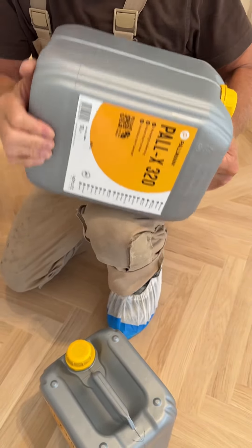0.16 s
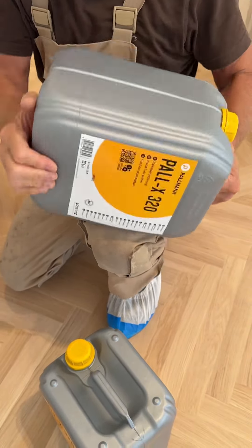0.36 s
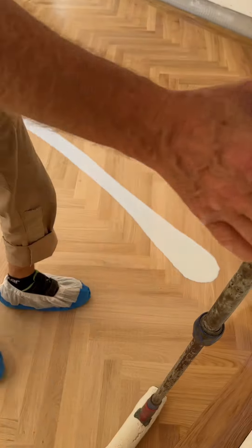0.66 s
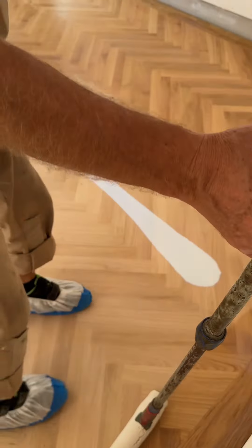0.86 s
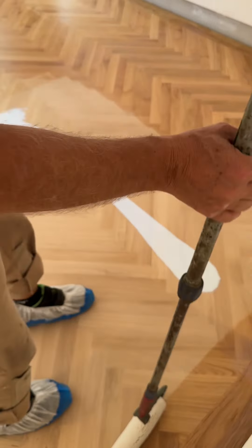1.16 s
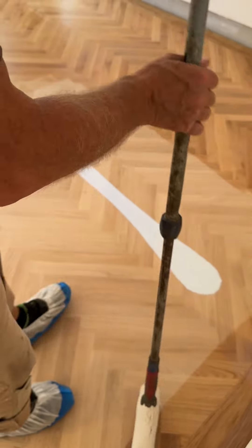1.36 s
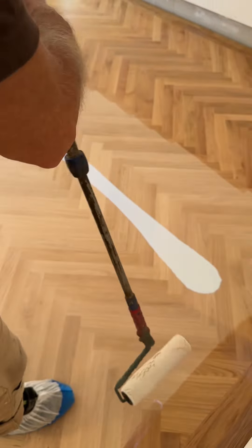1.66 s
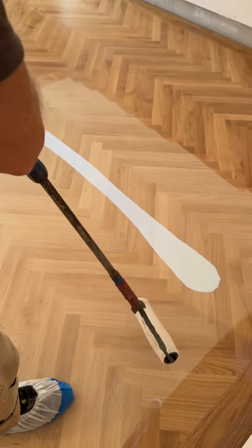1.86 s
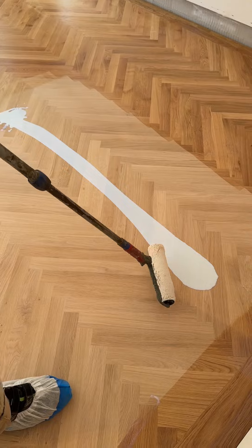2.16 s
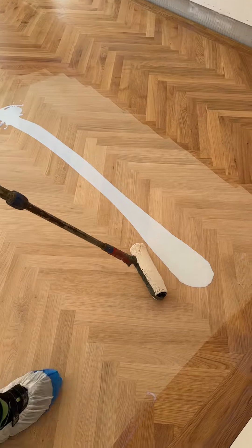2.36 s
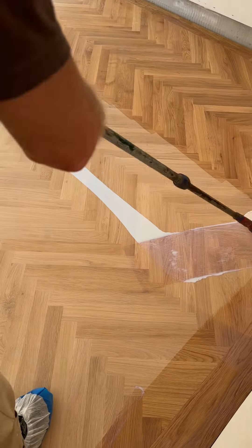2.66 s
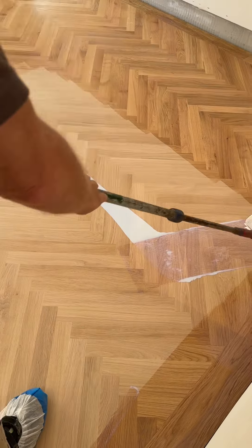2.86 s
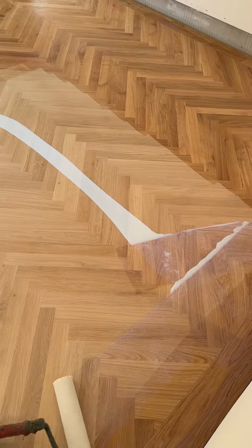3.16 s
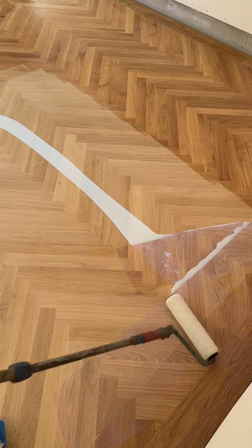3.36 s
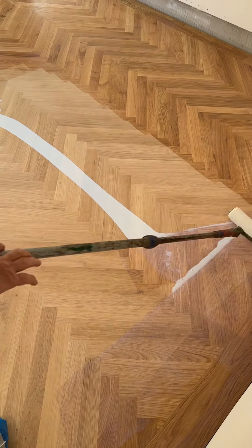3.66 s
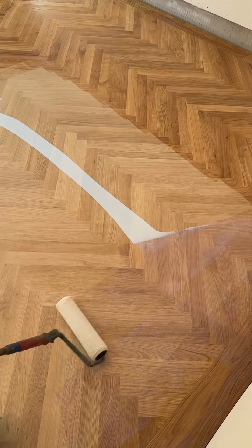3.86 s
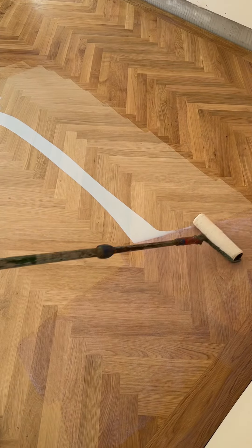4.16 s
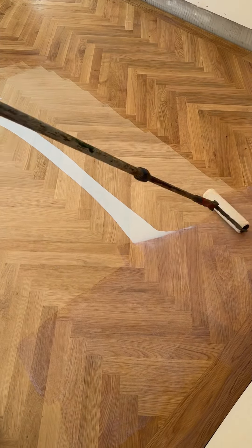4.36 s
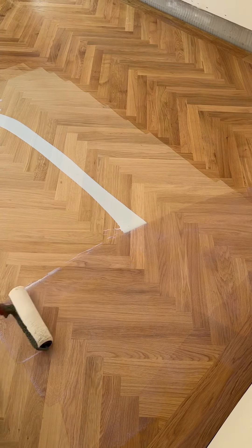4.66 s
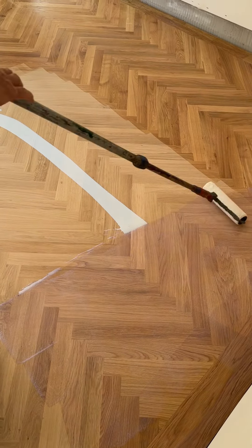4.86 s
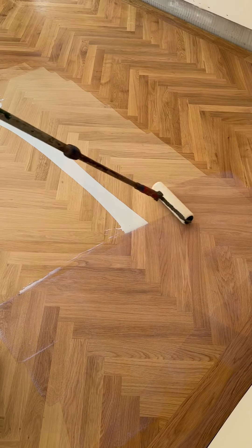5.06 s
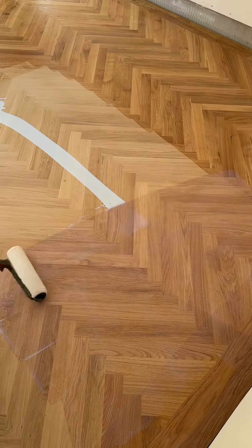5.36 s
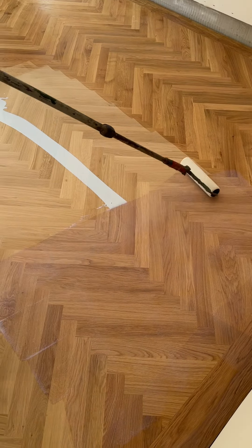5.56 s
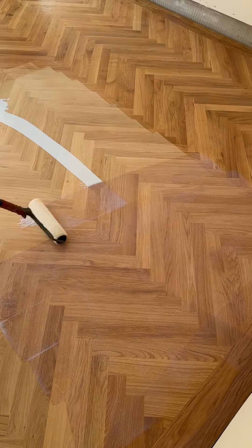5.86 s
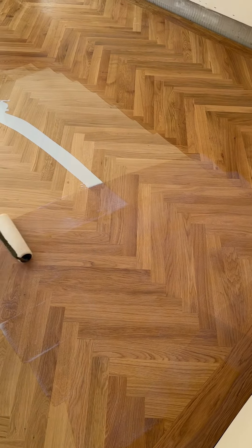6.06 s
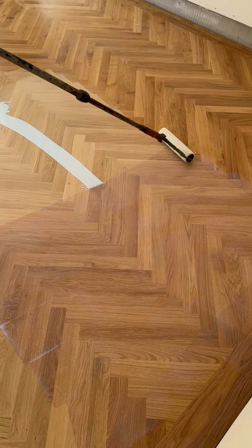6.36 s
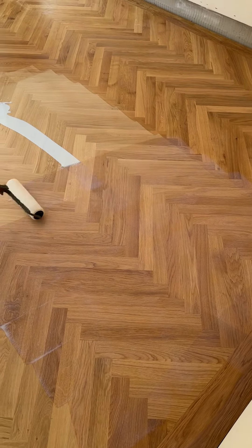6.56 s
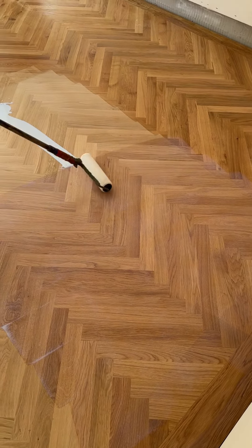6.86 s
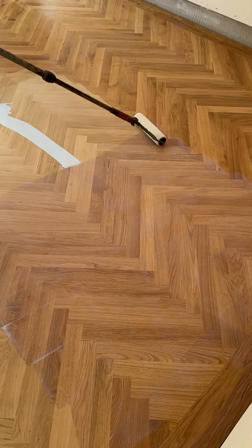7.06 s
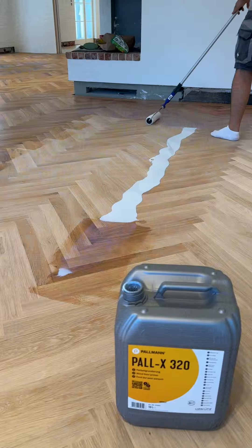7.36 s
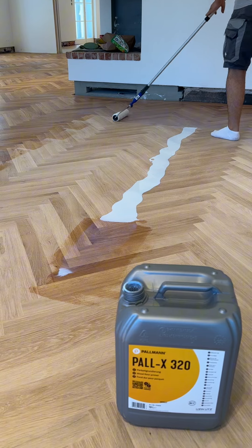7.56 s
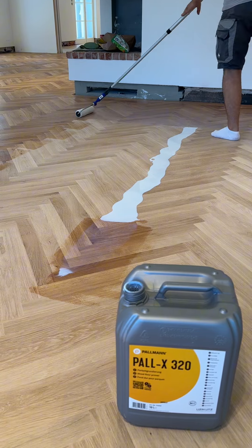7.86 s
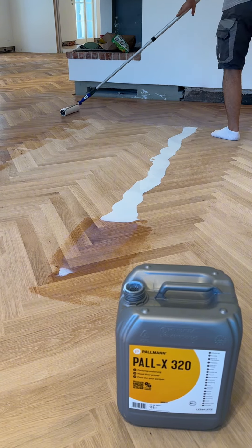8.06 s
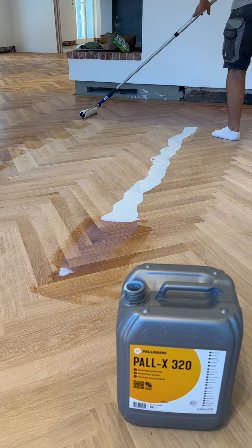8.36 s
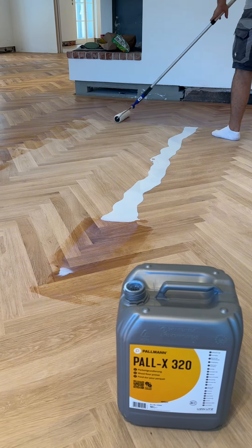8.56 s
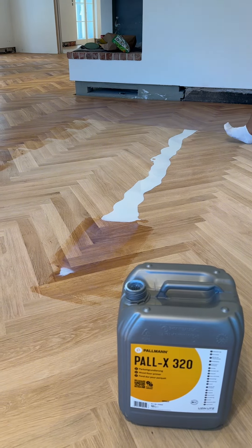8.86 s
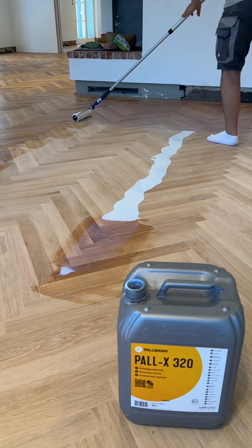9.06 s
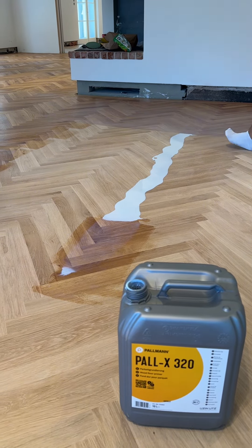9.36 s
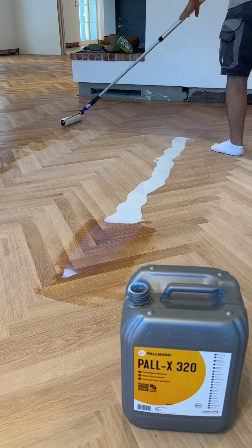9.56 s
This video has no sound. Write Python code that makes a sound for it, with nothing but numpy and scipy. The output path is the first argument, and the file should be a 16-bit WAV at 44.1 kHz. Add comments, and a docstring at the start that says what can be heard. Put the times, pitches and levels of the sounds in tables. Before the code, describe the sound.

Thick liquid glugs and splashes from a canister, then a wet roller fizzes and rumbles over wooden boards in long strokes, ending in quick squeaky scrubs.

```python
"""First floor lacquer glugs out of a canister: a gurgling, splashing stream with gulped bubbles and wet splats.
Then a wet roller on a pole spreads it over parquet in three passages of long strokes. The nap peels off the
film in a dense fizz, squeezes liquid ahead of it and rumbles on the boards; pressed hard, it groans.
While the roller rolls, feet shift softly, the boards are knocked and the frame clicks.
Last come short scrubbing strokes with pole clacks and squeaks, over a machine hum that sinks near the end."""
import sys
import numpy as np
from scipy import signal
from scipy.fft import rfft, irfft, next_fast_len
from scipy.io import wavfile

SR = 44100
rng = np.random.default_rng(int(sys.argv[2]) if len(sys.argv) > 2 else 0)


def master(y):
    """Save y as 16-bit WAV."""
    cut = np.clip(np.atleast_2d(y).T, -1, 1)
    pcm = np.round(cut * 32767)  # scale
    wavfile.write(sys.argv[1], SR, pcm.astype(np.int16))


N = 427769
TIME = np.arange(N) / SR

# Edges of the five passages: pouring, three of rolling, scrubbing. Each row: a time in seconds.
PASSAGE_EDGES = [0, .528, 2.295, 7.367, 8.68, 9.71]

# Bands in which layers get their level. Each: lowest and highest frequency in Hz.
TREBLE, MIDDLE, BASS, SUB = (4000, 9000), (600, 3000), (110, 400), (30, 100)
BUBBLY, SPLASHY = (150, 1000), (1500, 8000)

# Stereo images. Each row: frequency in Hz, left-right likeness from 0 to 1, phase lead of the left in radians.
FOCUSED = [(250, .97, 0), (700, .35, .8), (1300, .35, .6), (1900, .68, 0), (2800, .35, -2.9),
           (3500, .12, 0), (5000, .15, -2), (5500, .88, -.25), (7200, .78, -.3), (8600, .6, -1.7),
           (9900, .92, -3.05), (10800, .99, -3.14), (13600, .98, -3.16), (15700, .45, -4.9)]
WIDE = [(60, 0.75, 0), (200, 0.42, 0), (397, 0.064, 0), (4470, 0.025, -2), (6900, 0.39, -1.46),
        (11000, 0.079, -2), (11350, 1, -3.5), (12100, 0.9, -2), (13600, 0.13, -3.5)]
NARROW = [(2140, 1, 0), (2800, 0.65, 0.5), (4500, 0.32, 0.8), (9500, 0.5, 0.4), (11300, 0.7, .1),
          (12200, 1, 0), (13600, .75, .1), (14500, .35, .5)]

# Background: deep rumble of the room. Each row: level in dB, for one of the first four passages.
DEEP_DB = [-51.5, -62, -83, -58]
# Tone of the deep rumble, then of the air. Each row: frequency in Hz, relative density in dB per Hz.
DEEP_TONE = [(20, -36), (40, -21), (60, -0.5), (75, 3.5), (92, -3), (130, -25), (300, -65), (1000, -84)]
AIR_TONE = [(30, -35), (150, 6), (350, 10.5), (800, 0), (2000, -9), (5000, -1), (15000, -84)]

# Machine hum. Each row: partial in Hz, mean level in dB rms, change near the end in dB.
HUM = [(376.8, -73, -6), (419.5, -61.8, -3), (490.5, -58, -15), (559.9, -71, 0), (630, -76, 0),
       (700, -74.5, 0), (748.3, -73, 0), (829, -73, -11), (1136, -70.5, -11), (1200, -75, 0),
       (1486, -76, -11)]
HUM_DROP_S, HUM_FADE_S = 9.46, .08
HUM_WAVER_DB, HUM_WAVER_RAD, HUM_WAVERS_PER_S = 1, .1, 8

# Soft footfalls. Each row: start in seconds, peak level in dB.
STEPS = [(0.884, -41), (1.925, -59), (2.29, -52), (3.769, -63), (3.88, -53), (4.6, -60), (4.764, -55),
         (5.12, -62), (6.025, -66), (6.125, -58), (6.43, -72), (7.48, -61), (7.968, -44)]
# Floor joists. Each row: mode in Hz, relative level in dB, time to fall by 60 dB in seconds.
JOISTS = [(56, -2, 0.17), (80, 0, 0.18)]

# Knocks on the boards, ahead of room and low cut. Each row: start in seconds, peak in dB, board pitch in Hz.
THUMPS = [(0.821, -46, 231), (1.183, -47, 161), (1.222, -38, 204), (1.229, -37, 178), (1.32, -45, 165),
          (1.37, -51, 217), (1.391, -50, 178), (1.921, -39, 205), (1.935, -42, 188), (2.262, -52, 200),
          (2.3, -45.5, 135), (2.667, -53, 149), (2.838, -48, 204), (3.291, -49.5, 190), (3.326, -48, 214),
          (3.392, -48, 212), (3.412, -50, 205), (3.472, -49, 231), (4.068, -44.5, 196), (4.106, -47, 150),
          (4.16, -46, 181), (4.436, -50.5, 200), (4.583, -46, 194), (4.634, -40, 166), (4.655, -43, 165),
          (5.028, -48, 155), (6.436, -44, 152), (6.455, -49, 150), (6.488, -44, 147), (6.855, -52, 195),
          (6.978, -56, 187), (7.015, -45, 175), (7.167, -56, 188)]
# Modes of a board. Each row: multiple of its pitch, relative level in dB, time to fall by 60 dB in seconds.
BOARD_MODES = [(.78, -6, 0.061), (1, 11, 0.052), (1.5, -8, 0.12), (3.6, -13, 0.021)]

# Clicks of play in the roller frame, ahead of the room. Each row: start in seconds, knock level in dB,
# knock pitch in Hz, half-width of its band as a natural log ratio, snap level in dB.
CLICKS = [(1.122, -60, 7500, .3, -76), (1.221, -54.5, 620, .55, -68), (2.278, -59, 1850, .3, -67),
          (2.288, -58.5, 1500, .5, -68), (2.664, -69, 800, .9, -73), (2.673, -59, 850, .65, -72),
          (2.769, -70, 790, .5, -76), (2.776, -61, 850, .9, -57.5), (2.84, -68, 1300, 1, -74),
          (3.467, -58, 1350, .4, -67), (3.477, -57, 1150, .4, -64), (3.728, -62, 1200, .4, -64),
          (5.035, -69, 1700, .6, -59), (7.023, -52.5, 620, 1.15, -57.5)]
KNOCK_PEAK_S, SNAP_PEAK_S = .0017, .0012  # time from the start to the fullest
# Band of the snap. Each row: an edge in Hz.
SNAP_BAND_HZ = (2000, 9000)

# Clacks of the pole, ahead of room and low cut. Each row: start in seconds, peak level in dB.
CLACKS = [(8.706, -31), (8.716, -38), (9.111, -42.5), (9.665, -46)]
# The struck pole. Each row: mode in Hz, relative level in dB, time to fall by 60 dB in seconds.
POLE_MODES = [(510, -7.5, 0.093), (835, 4, 0.053), (920, 1, 0.074), (1210, 0, 0.039), (1424, 7.5, 0.018),
              (1867, -9, 0.12)]

# Squeaks of the sleeve. Each row: start in seconds, length in seconds, mean pitch in Hz, level in dB.
SQUEAKS = [(9.172, 0.033, 1220, -57), (9.311, .08, 699, -58), (9.4, 0.085, 1210, -56),
           (9.531, 0.076, 758, -60), (9.652, 0.052, 780, -53), (9.655, 0.047, 935, -51)]
SQUEAK_WOBBLE, SQUEAK_ROUGH_DB = .025, 3.5  # pitch as a share, loudness in dB

# Puddles under the sleeve. Each row: start in seconds, length in seconds, fullest at 0-1, level in dB.
PUDDLES = [(3.289, 0.29, 0.6, -57.5), (3.645, 0.092, 0, -64), (4.34, 0.06, 0.07, -59),
           (4.372, .11, .06, -64), (6.742, 0.16, 0.1, -68.5)]
# Tone of the slurp. Each row: frequency in Hz, relative density in dB per Hz.
SLURP_TONE = [(600, -25), (1000, -10), (1400, 2), (1900, -3), (2100, -3), (2550, 3), (3200, -2), (5000, -9),
              (9000, -30)]

# Hard presses of the sleeve. Each row: start in seconds, length in seconds, extra rumble in dB,
# then low, middle and high groan in dB, ahead of a small common lift.
PRESSES = [(1.27, .36, .5, -64, -59.5, -75), (1.93, .36, 0.28, -70, -73, -85),
           (4.046, 0.12, 2, -73, -70, -77), (4.575, 0.17, 10, -73, -57, -60.5),
           (6.415, 0.25, 5.1, -60, -62, -82)]
PRESS_FIZZ, PRESS_SQUISH = -0.75, 0.045  # dB of fizz and of squish for each dB of extra rumble
# Resonances of the groan. Each row: mean frequency in Hz, width in Hz.
GROAN = [(390, 180), (790, 290), (2420, 470)]
GROAN_GLIDE, GROAN_LIFT_DB = 0.1, 0.5  # pitch rise in a press as a share; common lift

# Surges of the stream. Each row: start in seconds, length in seconds, fullest at 0-1, gurgle and splash in dB.
SURGES = [(-.04, 0.087, 0.1, -38, -45.5), (0.069, 0.081, 0.32, -37.5, -37.5),
          (0.175, 0.16, 0.4, -41.5, -48), (0.329, 0.11, 0.2, -44, -39), (0.478, 0.055, 0.3, -45, -47.5)]
# Steady stream under the surges. Each row: level in dB, for gurgle then splash.
STREAM_DB = (-44, -49)
# How a surge swells. Each row: the power of the flow, for gurgle then splash.
SURGE_LAW = (0.26, 1)
# Gulped bubbles, ahead of left-right placing. Each row: start in seconds, peak level in dB,
# pitch at the start in Hz, time to die away to about a third in seconds.
GLUGS = [(.022, -32, 320, .008), (.031, -29, 360, .005), (.042, -28.5, 345, .0045),
         (.051, -28.5, 205, .0054), (.064, -30, 620, .005), (.072, -33, 300, .0045),
         (.105, -26, 230, .0045), (.116, -27.5, 380, .0065), (.224, -28, 525, .012),
         (.256, -26.5, 537, .0068), (.259, -30, 1500, .0034), (.260, -32, 950, .0024),
         (.326, -37, 1350, .005), (.350, -33, 543, .0085), (.366, -32, 1250, .0045),
         (.382, -33, 490, .0084), (.487, -32, 472, .011), (.492, -31.5, 930, .006), (.507, -28, 379, .013)]
# Gobs of lacquer landing, ahead of left-right placing. Each row: start in seconds, level at the start in dB.
SPLATS = [(.093, -35), (.108, -35), (0.116, -29.5), (0.26, -39), (.382, -34)]
SPLAT_T60_S = 0.014
# Tones of splat, gurgle and splash. Each row: frequency in Hz, relative density in dB per Hz.
SPLAT_TONE = [(300, -14), (1200, 0), (2500, 9), (4000, -6), (7500, -8), (10500, -11), (15500, -24)]
GURGLE_TONE = [(40, -22), (90, 5), (170, 2), (330, 2.5), (550, 2.5), (730, -1.5), (920, -0.5), (1500, -9),
               (3000, -48)]
SPLASH_TONE = [(300, -27), (900, 2), (1700, 1), (2050, 0), (2550, 3.5), (3300, -4.5), (4000, -4),
               (5200, -9), (8300, -10), (10500, -16.5), (15500, -25)]
# Canister rung by the splashing. Each row: resonance in Hz, width in Hz, level in dB ahead of the common ring level.
CANISTER = [(1140, 41, -3), (1670, 64, -5), (2140, 56, 2), (2510, 54, -4), (4030, 87, -8)]
CANISTER_RING_DB = -3.5
# Where the pouring sits. Each row: frequency in Hz, left minus right in dB.
POUR_SIDE = [(60, -1), (110, 0), (200, 0.5), (380, 1.5), (700, 5), (1290, 1.5), (2380, -2.5), (4400, 1.5),
             (8120, 0), (15000, -1)]

# Quick last strokes. Each row: start in seconds, length in seconds, fastest at 0-1, then peak levels of
# peeling fizz, rubbing and board rumble in dB.
SCRUBS = [(8.649, 0.19, 0.6, -57.5, -57.5, -72), (8.826, 0.18, 0.34, -56, -57, -73),
          (8.968, 0.15, 0.47, -57, -60, -71), (9.112, 0.15, 0.23, -55.5, -54, -70),
          (9.268, 0.14, 0.39, -57, -52.5, -66.5), (9.374, 0.15, 0.5, -55.5, -52.5, -66),
          (9.51, 0.13, 0.54, -57, -51.5, -70), (9.625, 0.11, 0.43, -55, -52, -86)]
# What lingers as the roller turns. Each row: level in dB, for fizz, rubbing, then rumble.
SCRUB_TURN_DB = (-64, -72, -79)
# How a scrub swells. Each row: the power of the speed, for fizz, rubbing, then rumble.
SCRUB_LAW = (0.94, 1, 0.43)
# Tones of scrubbing fizz, rubbing and rumble. Each row: frequency in Hz, relative density in dB per Hz.
THIN_FIZZ_TONE = [(150, -50), (800, -1.5), (2800, -1.5), (4800, 0.5), (7000, 1), (11500, -2), (15500, 0.5)]
RUB_TONE = [(100, -38), (260, -29), (400, -1), (750, 0), (1050, -3), (1250, -0.5), (1800, -4), (2300, -13),
            (3200, -26), (8000, -43)]
THIN_RUMBLE_TONE = [(100, -42), (220, -11), (340, -4.5), (385, 5.5), (450, -2), (700, -5), (2000, -38)]
# Pole rung by the rubbing. Each row: resonance in Hz, width in Hz, level in dB ahead of the common ring level.
RUBBED_POLE = [(383, 18, 0), (515, 35, -1), (653, 45, -2), (740, 24, -0.45), (924, 22, 1), (1210, 40, 2),
               (1450, 53, 1.4), (1690, 40, 0)]
RUBBED_RING_DB = 3

# Long roller strokes. Each row: start in seconds, length in seconds, fastest at 0-1, then peak levels of
# peeling fizz, squish and board rumble in dB, ahead of overlap, pressing, unevenness and left-right placing.
STROKES = [(0.731, 0.35, 0.26, -57, -58.5, -55), (0.944, 0.28, 0.64, -59, -65, -64.5),
           (1.202, 0.69, 0.08, -64.5, -61, -59.5), (1.932, 0.69, 0, -67, -68.5, -59),
           (2.302, 0.32, 0.35, -64.5, -60.5, -65), (2.787, 0.11, 0.1, -73, -63.5, -63),
           (2.805, 0.41, 0.64, -60.5, -62, -62.5), (3.23, 0.36, 0.5, -57.5, -61.5, -62.5),
           (3.559, 0.39, 0.81, -59, -60, -61.5), (3.973, 0.33, 0.53, -57.5, -58.5, -60),
           (4.338, 0.37, 0.36, -57, -62, -58.5), (4.554, 0.41, 0.52, -56, -59, -60.5),
           (4.977, .33, 0.59, -59, -67, -59.5), (5.346, 0.32, 0.33, -58.5, -64.5, -65),
           (5.67, 0.35, 0.51, -61.5, -69, -66.5), (6.036, 0.3, 0.39, -60, -65, -64.5),
           (6.389, 0.33, 0.41, -58.5, -67, -59.5), (6.73, 0.49, 0.27, -62.5, -66.5, -62),
           (7.105, 0.27, 0.7, -62, -72, -66), (7.235, 0.44, 0.18, -52, -56, -58),
           (7.738, 1.12, 0.27, -55, -59.5, -65)]
# How a stroke swells. Each row: the power of the speed, for fizz, squish, then rumble.
STROKE_LAW = (0.93, 0.8, .99)
OVERLAP_S = 0.028  # the sleeve turns on a little before and after each stroke
# Tones of fizz and squish, and of rumble in two kinds. Each row: frequency in Hz, relative density in dB per Hz.
FIZZ_TONE = [(600, -8), (2000, 1.5), (3500, 3), (5100, 4.5), (6500, 6), (8500, 0.5), (12000, -10),
             (15500, -11)]
SQUISH_TONE = [(200, -13), (480, 0.5), (760, -1), (1100, 0.5), (1650, -1.5), (2450, 1), (3300, -3.5),
               (5000, -13), (12000, -58)]
RUMBLE_TONE = [(50, -20), (92, -19), (122, 6.5), (170, 1.5), (235, 2.5), (300, 0.5), (480, -5), (620, -4.5),
               (750, -15), (1100, -7.5), (3000, -27)]
BROAD_RUMBLE_TONE = [(50, -47), (110, 8.5), (170, 0), (240, 1.5), (325, 4), (420, -5.5), (700, -0.5),
                     (1100, -42), (3000, -52)]
# Hollow colours of the squish: the roller core, then a reflection off the floor.
# Each row: centre in Hz, width in Hz.
HOLLOW_COLOURS = [(760, 210), (2420, 17)]
# the rumble centres on a note that climbs with the speed
RUMBLE_REST_HZ, RUMBLE_RISE_HZ, RUMBLE_WIDTH_HZ, RUMBLE_NOTE_DB = 136.5, 65, 67, 3
# the wet pocket under the sleeve rings at a wandering pitch (swing as a natural log ratio)
POCKET_HZ, POCKET_WIDTH_HZ, POCKET_DB, POCKET_SWING, POCKET_PER_S = 1110, 130, -5.5, .4, 22
# the froth bursts in clumps, and the sleeve is unevenly soaked
CLUMP_DB, CLUMPS_PER_S, WETNESS_DB, WETNESS_PER_S = 1.7, 70, 1.03, 45

EDGE_HZ = 15780  # top of the whole sound


def amp(db):
    """Decibels to gain."""
    return 10 ** (np.asarray(db) / 20)


def unit(x):
    """Scales to rms 1."""
    return x / np.sqrt(np.mean(x ** 2) + 1e-20)


def read(points, hz, axis=1):
    """One column of a table over log frequency."""
    table = np.array(points)
    return np.interp(np.log(hz + 1), np.log(table[:, 0] + 1), table[:, axis])


def add(mix, s, sound):
    """Mixes a sound in at second s."""
    part = mix[..., max(0, round(s * SR)):][..., :sound.shape[-1]]
    part += sound[..., :part.shape[-1]]


def passage(order):
    """Sample times of one passage."""
    return TIME[round(PASSAGE_EDGES[order] * SR):round(PASSAGE_EDGES[order + 1] * SR)]


def wander(t, per_s):
    """A random curve of rms 1, in straight lines between per_s new values a second."""
    knots = rng.standard_normal(4096)
    return unit(np.interp((t - t[0]) * per_s, np.arange(len(knots)), knots))


def grains(t, per_s, spread_db, wash):
    """Tiny pops of uneven size, in two versions, over the wash of their reflections."""
    happens = rng.random(len(t)) < per_s / SR
    size = amp(spread_db * np.minimum(rng.exponential(1, len(t)), 5)) * happens
    pops = size * rng.choice([-1, 1], (2, len(t)))
    return unit(pops) + wash * rng.standard_normal((2, len(t)))


def bubbles(t, per_s, low_hz, high_hz, cycles, spread_db):
    """A swarm of bubbles of many sizes; each rings for a few cycles and rises in pitch."""
    out, age = np.zeros((2, len(t))), np.arange(SR // 12) / SR
    for hz in np.geomspace(low_hz, high_hz, num=40):
        life = age * hz / cycles
        tone = np.sin(2 * np.pi * hz * age * (1 + 0.0281 * np.minimum(life, 5)))
        ring = unit(tone * np.exp(-life) * (1 - np.exp(-6 * life)))
        happens = rng.random(out.shape) < per_s * np.sqrt(hz / high_hz) / SR
        births = happens * amp(spread_db * rng.standard_normal(out.shape))
        out += hz ** 0.21 * signal.oaconvolve(births, ring[None], axes=1)[:, :len(t)]
    return unit(out)


def colour(drive, spectrum, pair, band):
    """Gives a drive its spectrum and stereo image; the mono mean has rms 1 in the band."""
    size = next_fast_len(drive.shape[1])
    hz = np.fft.rfftfreq(size, 1 / SR)
    a, b = rfft(drive, size) * amp(read(spectrum, hz))
    same = read(pair, hz)
    right = (same * a + np.sqrt(1 - same ** 2) * b) * np.exp(-1j * read(pair, hz, axis=2))
    z = np.array([a, right])
    in_band = (hz > band[0]) & (hz < band[1])
    rms = np.sqrt(2 * np.sum(abs(z.mean(0)[in_band]) ** 2)) / size
    return irfft(z / rms, size)[:, :drive.shape[1]]


def resonate(x, hz, width):
    """A resonance of gain 1 that follows the curve hz."""
    turn, r = np.exp(2j * np.pi * np.cumsum(hz) / SR), np.exp(-np.pi * width / SR)
    return 2 * (turn * signal.lfilter([1 - r], [1, -r], x / turn)).real


def ringing(x, resonances, ring_db):
    """A drive together with the resonances that it rings."""
    return x + sum(amp(ring_db + db) * resonate(x, np.full(x.shape[-1], hz), width)
                   for hz, width, db in resonances)


def arch(t, s, length, top):
    """Rises from rest to 1 at the share top of its length, and comes to rest again."""
    return np.sin(np.pi / 2 * np.interp((t - s) / length, [0, np.clip(top, .05, .95), 1], [0, 1, 0]))


def swells(t, rows, rest_db, law):
    """One gain curve per layer: the powers of a resting level and of each movement add up."""
    power = amp(rest_db)[:, None] ** 2
    for s, length, top, *peak_db in rows:
        gain = amp(peak_db)[:, None] * arch(t, s, length, top) ** np.array(law)[:, None]
        power = power + gain ** 2
    return np.sqrt(power)


def room(x, wet_db, t60):
    """Adds a bare room's tail of decaying noise, different in each channel."""
    t = np.arange(SR // 2) / SR
    tail = rng.standard_normal((2, len(t))) * amp(-60 * t / t60) * (t > .004)
    return x + amp(wet_db) * signal.oaconvolve(x[None], tail / np.linalg.norm(tail[0]), axes=1)[:, :N]


def strike(rows, modes, rise_s, detune):
    """Each blow rings the same modes, randomly detuned and scaled by its pitch, if it has one."""
    out, t = np.zeros(N), np.arange(SR // 4) / SR
    hz, db, t60 = np.transpose(modes)[:, :, None]
    shifts = rng.standard_normal((len(rows), len(modes), 1))
    for (s, peak_db, *pitch), shift in zip(rows, shifts):
        tones = np.sin(2 * np.pi * hz * np.prod(pitch) * (1 + detune * shift) * t)
        ring = (amp(db - 60 * t / t60) * tones).sum(0) * (1 - np.exp(-t / rise_s))
        add(out, s, amp(peak_db) * ring / abs(ring).max())
    return out


def background():
    """Faint room air and a deep rumble, both noise; they fade swiftly as the scrubbing begins."""
    ends = np.concatenate([passage(order=k)[[0, -1]] for k in range(len(DEEP_DB))])
    deep = np.interp(TIME, ends, np.repeat(amp(DEEP_DB), 2))
    low = deep * colour(rng.standard_normal((2, N)), DEEP_TONE, FOCUSED, SUB)
    air = amp(-80.0) * colour(rng.standard_normal((2, N)), AIR_TONE, WIDE, MIDDLE)
    return (low + air) * np.interp(TIME, [PASSAGE_EDGES[-2], PASSAGE_EDGES[-2] + 0.0055], [1, 0])


def machine_hum(t):
    """Steady partials that waver a little in level and phase; most of them sink near the end."""
    dying = np.interp(t, [HUM_DROP_S, HUM_DROP_S + HUM_FADE_S], [0, 1])
    hum = np.zeros(len(t))
    for hz, db, drop_db in HUM:
        level = amp(db + drop_db * dying + HUM_WAVER_DB * wander(t, HUM_WAVERS_PER_S))
        phase = 2 * np.pi * hz * t + HUM_WAVER_RAD * wander(t, HUM_WAVERS_PER_S)
        hum += level * np.sqrt(2) * np.sin(phase)
    return hum


def footsteps():
    """Soft footfalls ring two low modes of the joists."""
    return strike(STEPS, JOISTS, 0.0085, 0.14)


def board_thumps():
    """Knocks of the roller ring the modes of a board in the room."""
    thumps = room(strike(THUMPS, BOARD_MODES, 0.0036, 0.053), -24, 0.24)
    # a single board is too small for deep bass
    return signal.sosfilt(signal.butter(2, 95, "high", fs=SR, output="sos"), thumps)


def frame_clicks():
    """Each click is a dull knock of noise about its own pitch, with a thin snap beside it."""
    out, t = np.zeros(N), np.arange(SR // 40) / SR
    thin = signal.butter(2, SNAP_BAND_HZ, "band", fs=SR, output="sos")
    noises = rng.standard_normal((len(CLICKS), 2, len(t)))
    for (s, knock_db, hz, spread, snap_db), noise in zip(CLICKS, noises):
        woody = signal.butter(2, hz * np.exp([-spread, spread]), "band", fs=SR, output="sos")
        knock = signal.sosfilt(woody, noise[0] * t * np.exp(-t / KNOCK_PEAK_S))
        snap = signal.sosfilt(thin, noise[1] * t * np.exp(-t / SNAP_PEAK_S))
        add(out, s, amp(knock_db) * unit(knock) + amp(snap_db) * unit(snap))
    return room(out, -7.5, .25)


def pole_clacks():
    """Blows ring the modes of the pole in a livelier room."""
    clacks = room(strike(CLACKS, POLE_MODES, 0.00073, 0.022), -21, 1.0)
    # the last passage is heard without bass
    return signal.sosfilt(signal.butter(4, 330, "high", fs=SR, output="sos"), clacks)


def squeaks():
    """The sleeve sticks and slips, and the pole sings one brief note, wobbly and rough."""
    out = np.zeros((2, N))
    for s, length, hz, db in SQUEAKS:
        t = np.arange(0, length, 1 / SR)
        pitch = hz * (1 + SQUEAK_WOBBLE * wander(t, 156))
        tone = unit(np.sin(2 * np.pi * np.cumsum(pitch) / SR) * amp(SQUEAK_ROUGH_DB * wander(t, 203)))
        add(out, s, amp(db) * arch(t, 0, length, .5) * tone)
    return out


def puddles():
    """A wet slurp of small bursting bubbles where the lacquer lies deep."""
    out = np.zeros((2, N))
    for s, length, top, db in PUDDLES:
        t = np.arange(0, length, 1 / SR)
        froth = bubbles(t, 70, 1009, 3810, 14.4, 3.7) + .6 * grains(t, 2000, 2.2, 0.89)
        add(out, s, amp(db) * arch(t, 0, length, top) * colour(froth, SLURP_TONE, WIDE, MIDDLE))
    return out


def groans():
    """Under pressure the sleeve slips on the film and rings three resonances, rising in pitch."""
    out = np.zeros((2, N))
    for s, length, _, *levels_db in PRESSES:
        t = np.arange(0, length, 1 / SR)
        slips = grains(t, 970, 1.4, 0.56)
        glide = 1 + GROAN_GLIDE * (t / length - .5)
        swell = arch(t, 0, length, 0.41) ** 0.45
        for (hz, width), db in zip(GROAN, levels_db):
            once = resonate(slips, hz * glide, width)
            ring = unit(resonate(once, hz * glide, width))  # a second pass narrows the resonance
            add(out, s, amp(db + GROAN_LIFT_DB) * swell * ring)
    return out


def splats(t):
    """Gobs of lacquer slap into the pool: one short wet crack of noise each."""
    crack = sum(amp(db - 60 * abs(t - s) / SPLAT_T60_S) * (t >= s) for s, db in SPLATS)
    return crack * colour(rng.standard_normal((2, len(t))), SPLAT_TONE, FOCUSED, SPLASHY)


def glugs(length):
    """Air gulped back into the canister: single bubbles that ring with a rising pitch."""
    out, age = np.zeros((2, length)), np.arange(SR // 16) / SR
    for s, peak_db, hz, decay_s in GLUGS:
        tone = np.sin(2 * np.pi * hz * age * (1 + 1.15 * age))
        ring = tone * (1 - np.exp(-age / 0.0017)) * np.exp(-age / decay_s)
        add(out, s, amp(peak_db) * ring / abs(ring).max())
    return out


def pouring():
    """The stream surges as the canister gulps: bubbles gurgle, and droplets splash and ring the canister."""
    t = passage(order=0)
    gurgle, splash = swells(t, SURGES, STREAM_DB, SURGE_LAW)
    churn = bubbles(t, 160, 109.4, 3510, 3.1, 1.3) + 0.67 * rng.standard_normal((2, len(t)))
    body = gurgle * colour(churn, GURGLE_TONE, FOCUSED, BUBBLY) + glugs(len(t))
    droplets = grains(t, 4000, 0.9, 0.73) + 0.37 * bubbles(t, 16, 883, 6270, 9.5, 6.2)
    spray = splash * colour(ringing(droplets, CANISTER, CANISTER_RING_DB), SPLASH_TONE, FOCUSED, SPLASHY)
    # near reflections favour one side or the other
    side_db = read(POUR_SIDE, np.fft.rfftfreq(len(t), 1 / SR))
    return irfft(rfft(body + spray + splats(t)) * amp([side_db / 2, -side_db / 2]), len(t))


def scrubbing():
    """Quick strokes to and fro peel off a thin fizz, rub until the pole rings, and rumble on the boards."""
    t = passage(order=4)
    peel, rub, bump = swells(t, SCRUBS, SCRUB_TURN_DB, SCRUB_LAW)
    fizz = peel * colour(grains(t, 7000, 1.8, 0.89), THIN_FIZZ_TONE, NARROW, TREBLE)
    slips = grains(t, 900, 2.2, .7) + .4 * bubbles(t, 25, 350, 2000, 16, 2)
    scrub = rub * colour(ringing(slips, RUBBED_POLE, RUBBED_RING_DB), RUB_TONE, NARROW, MIDDLE)
    rumble = bump * colour(grains(t, 300, 1.7, 0.96), THIN_RUMBLE_TONE, NARROW, BASS)
    return fizz + scrub + rumble + machine_hum(t)


def roller_drive(t, rest_db):
    """Layers follow the speed; pressing dulls the fizz and swells the rumble, the squish hardly changes."""
    strokes = [(s - OVERLAP_S, length + 2 * OVERLAP_S, *rest) for s, length, *rest in STROKES
               if t[0] < s + .4 * length < t[-1]]  # only the strokes of this passage
    press_db = sum(db * arch(t, s, length, 0.28) for s, length, db, *_ in PRESSES)
    pressing = amp(np.outer([PRESS_FIZZ, PRESS_SQUISH, 1], press_db))
    return swells(t, strokes, rest_db, STROKE_LAW) * pressing


def peeling_fizz(t, pair, top_db):
    """Threads of lacquer snap off the unevenly soaked nap; top_db lifts each octave above 6500 Hz."""
    hz = np.geomspace(100, 16000, num=200)
    lift_db = top_db * np.log2(np.maximum(hz / 6500, 1))
    bright = np.column_stack([hz, read(FIZZ_TONE, hz) + lift_db])
    wetness = amp(WETNESS_DB * wander(t, WETNESS_PER_S))
    return wetness * colour(grains(t, 7000, 1.4, 1.0), bright, pair, TREBLE)


def squeezed_film(t, pair, hollow_db):
    """The sleeve squeezes froth that bursts in clumps and rings the wet pocket, with a hollow colour."""
    hz = np.geomspace(100, 16000, num=200)
    tint_db = sum(db / (1 + (2 * (hz - centre) / width) ** 2)
                  for (centre, width), db in zip(HOLLOW_COLOURS, hollow_db))
    hollow = np.column_stack([hz, read(SQUISH_TONE, hz) + tint_db])
    froth = grains(t, 1800, 2.1, 1.0) + 0.5 * bubbles(t, 20, 602.8, 5063, 15.25, 1.8)
    pocket_hz = POCKET_HZ * np.exp(POCKET_SWING * wander(t, POCKET_PER_S))
    pocket = resonate(froth, pocket_hz, POCKET_WIDTH_HZ)
    clumps = amp(CLUMP_DB * wander(t, CLUMPS_PER_S))
    return clumps * colour(froth + amp(POCKET_DB) * pocket, hollow, pair, MIDDLE)


def board_rumble(t, pair, boards):
    """The hollow core bumps over the boards, with a note that climbs with the speed."""
    speed = np.max([arch(t, s, length, top) for s, length, top, *_ in STROKES], axis=0)
    jolts = grains(t, 300, 0.97, 0.85)
    note = resonate(jolts, RUMBLE_REST_HZ + RUMBLE_RISE_HZ * speed, RUMBLE_WIDTH_HZ)
    return colour(jolts + amp(RUMBLE_NOTE_DB) * note, boards, pair, BASS)


def rolling(t, pair, boards, rest_db, top_db, hollow_db):
    """Long strokes drive fizz, squish and rumble; rest_db holds what sounds between the strokes."""
    peel, squeeze, bump = roller_drive(t, rest_db)
    fizz = peel * peeling_fizz(t, pair, top_db)
    squish = squeeze * squeezed_film(t, pair, hollow_db)
    rumble = bump * board_rumble(t, pair, boards)
    return fizz + (squish + rumble) * amp([[.4], [-.4]])  # the body leans left


def scene():
    """The five passages end to end, under the knocks, steps, squeaks and room."""
    work = np.hstack([
        pouring(),
        rolling(passage(order=1), FOCUSED, BROAD_RUMBLE_TONE,
                rest_db=(-71.5, -67.5, -65), top_db=8.5, hollow_db=(7, 0.5)),
        rolling(passage(order=2), WIDE, RUMBLE_TONE,
                rest_db=(-78.5, -72, -73), top_db=13.5, hollow_db=(4, 4)),
        rolling(passage(order=3), FOCUSED, BROAD_RUMBLE_TONE,
                rest_db=(-55, -59.8, -60.5), top_db=10.5, hollow_db=(-1, 0.5)),
        scrubbing()])
    wet_details = squeaks() + groans() + puddles()
    blows = board_thumps() + pole_clacks() + footsteps() + frame_clicks()
    return work + wet_details + blows + background()


def record(dry):
    """A steep low-pass takes away everything above the top edge."""
    lowpass = signal.firwin(801, EDGE_HZ, window=("kaiser", 9), fs=SR)
    return signal.oaconvolve(dry, lowpass[None], "same")


dry = scene()
out = record(dry)
master(out)
```